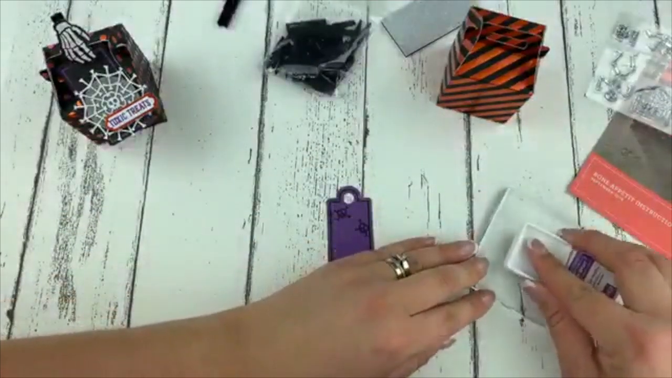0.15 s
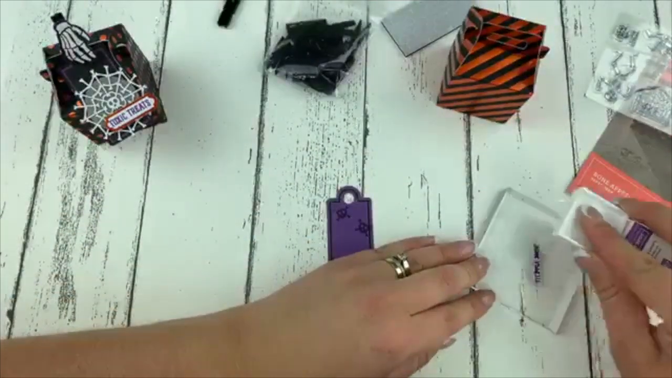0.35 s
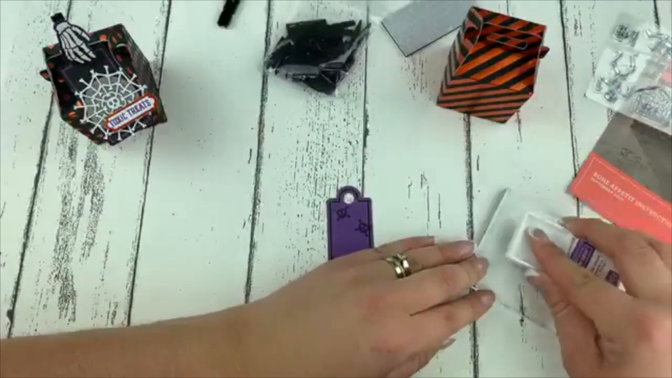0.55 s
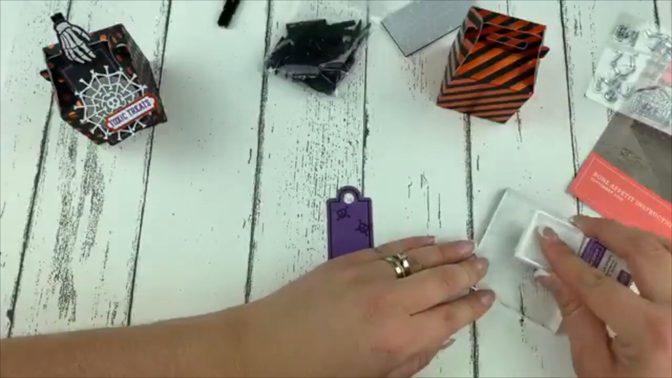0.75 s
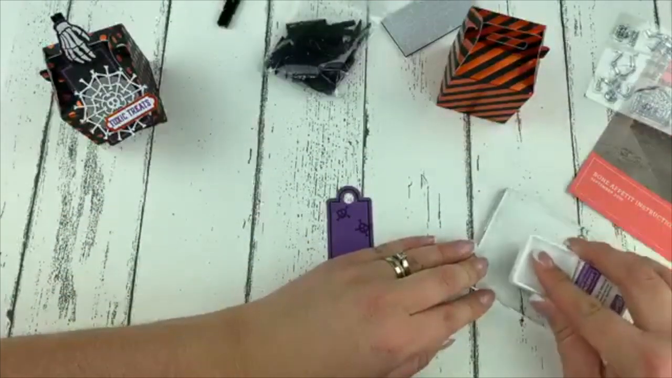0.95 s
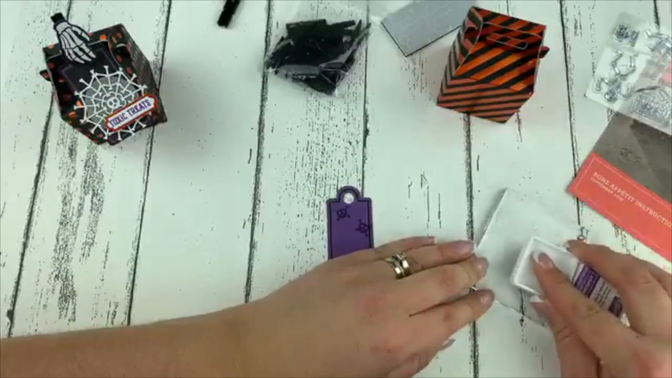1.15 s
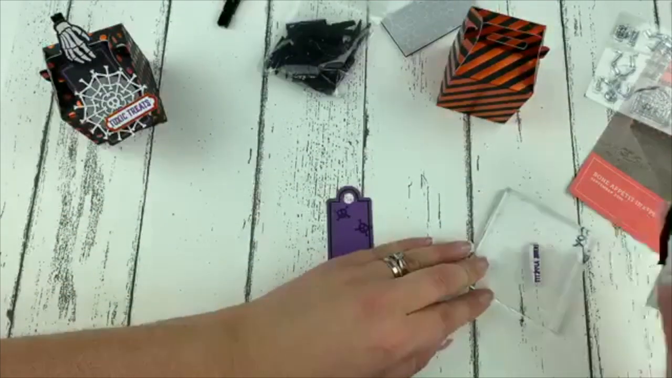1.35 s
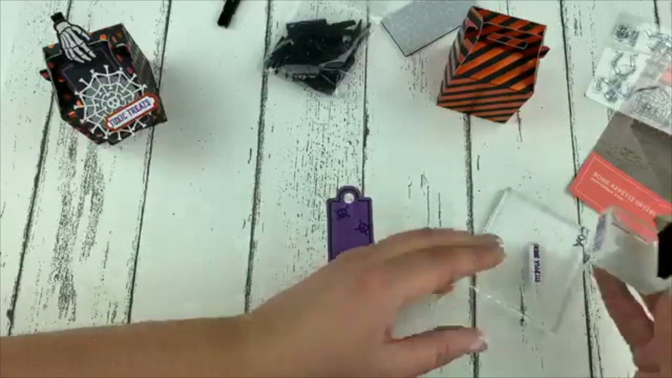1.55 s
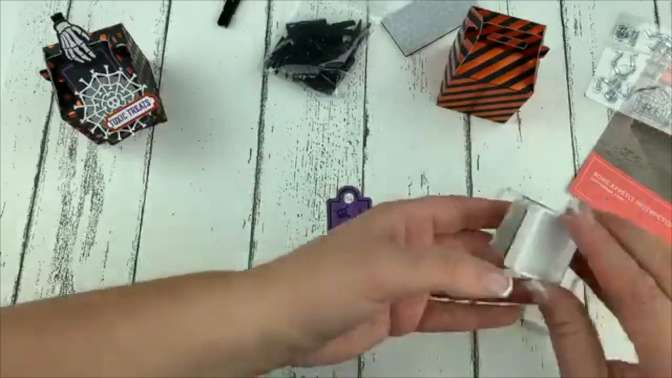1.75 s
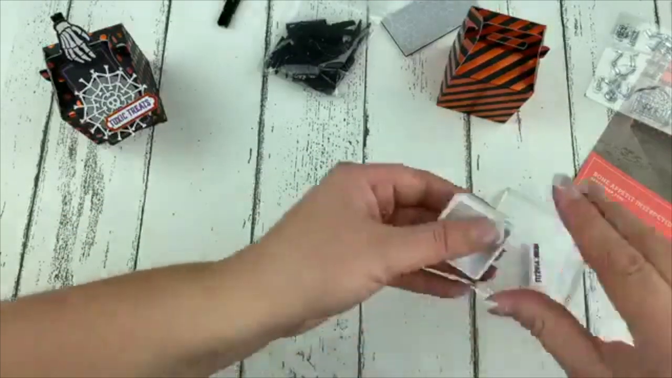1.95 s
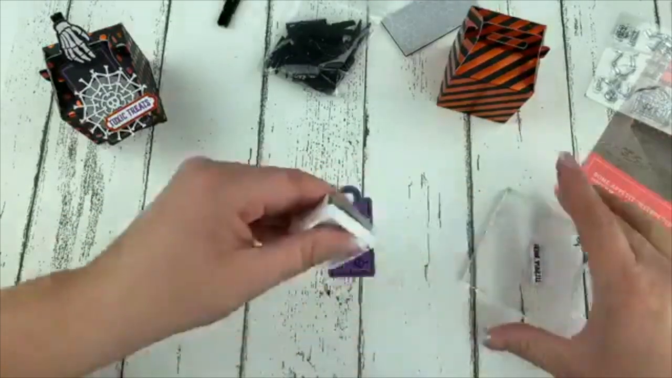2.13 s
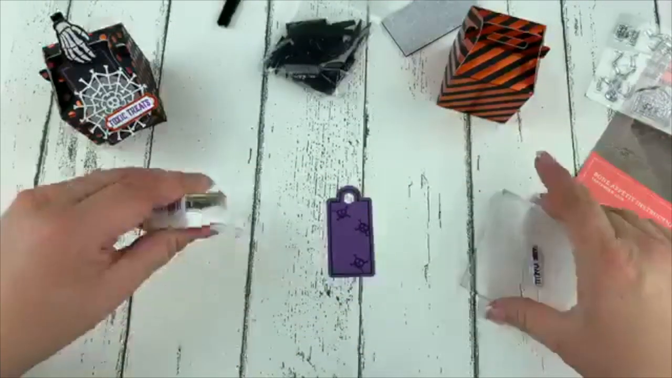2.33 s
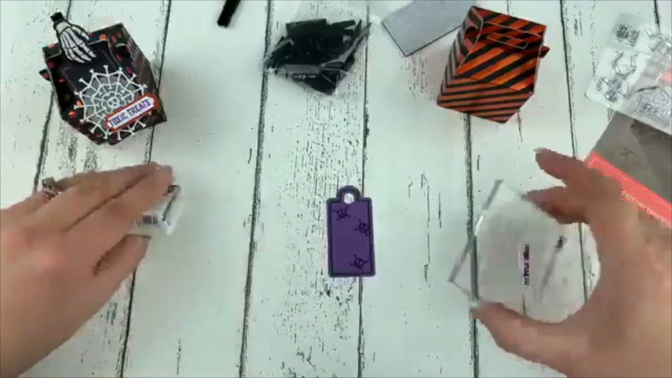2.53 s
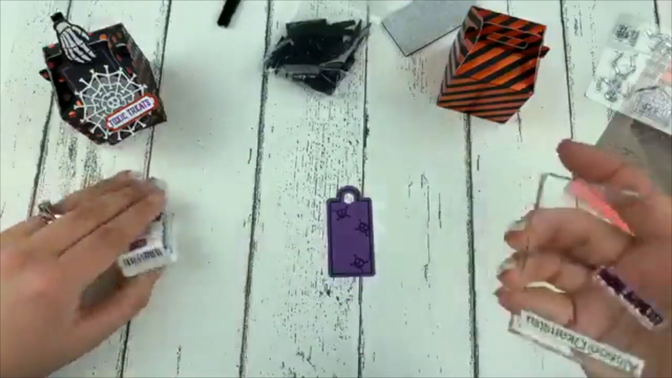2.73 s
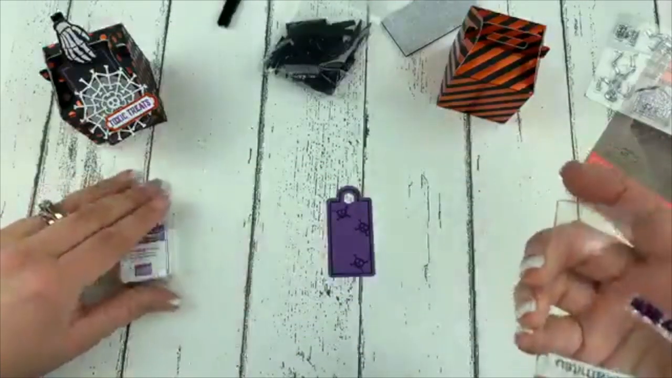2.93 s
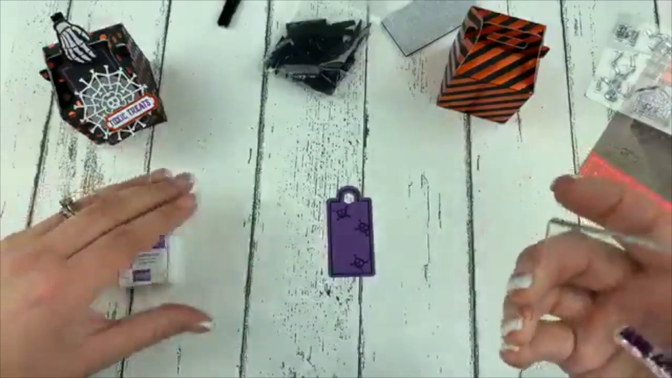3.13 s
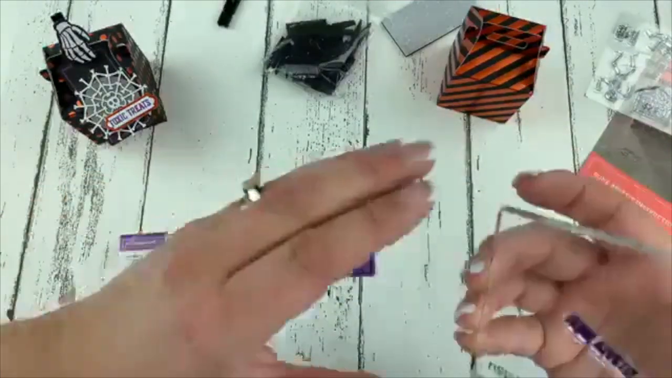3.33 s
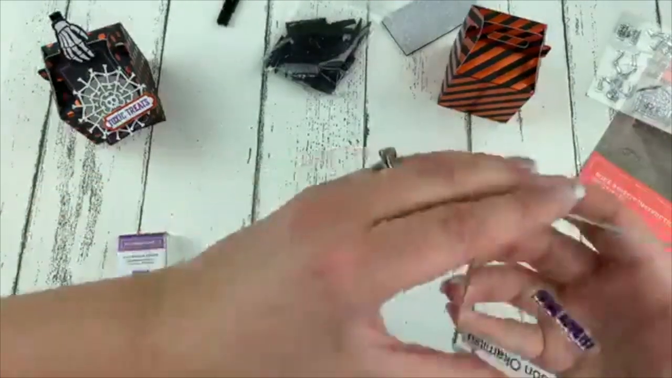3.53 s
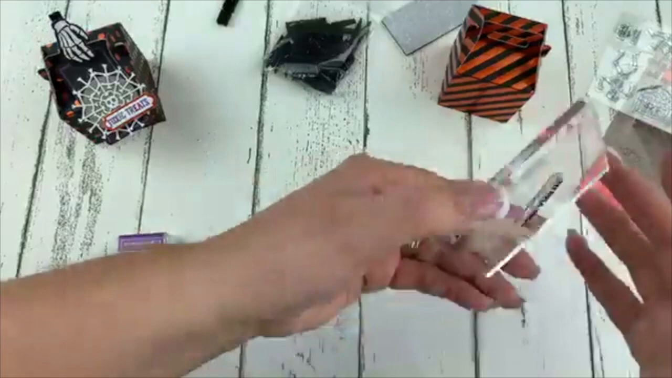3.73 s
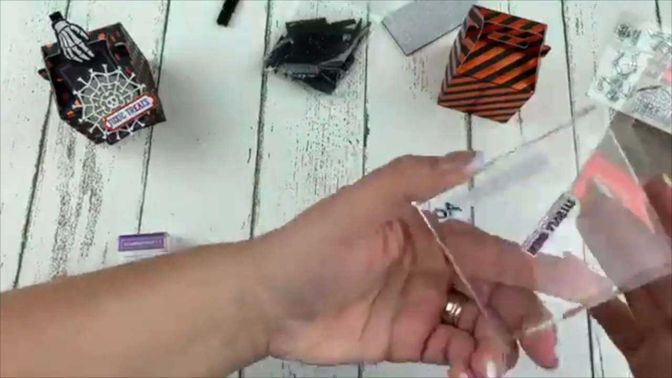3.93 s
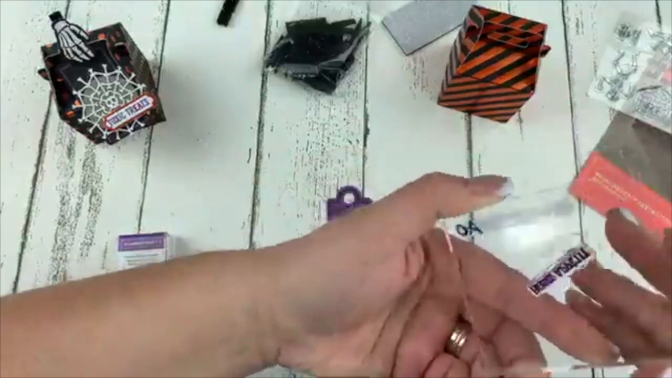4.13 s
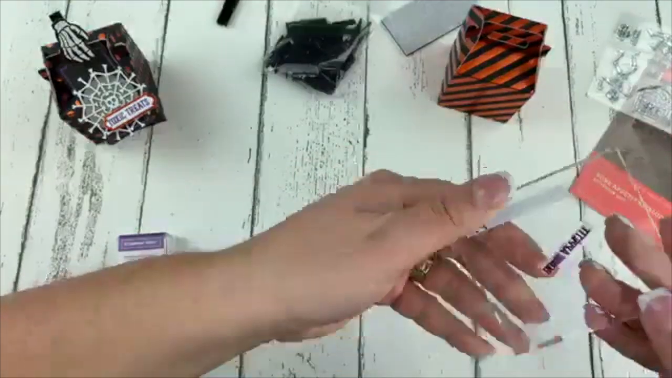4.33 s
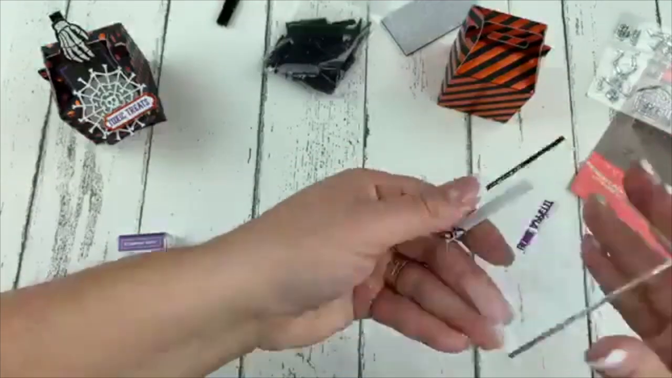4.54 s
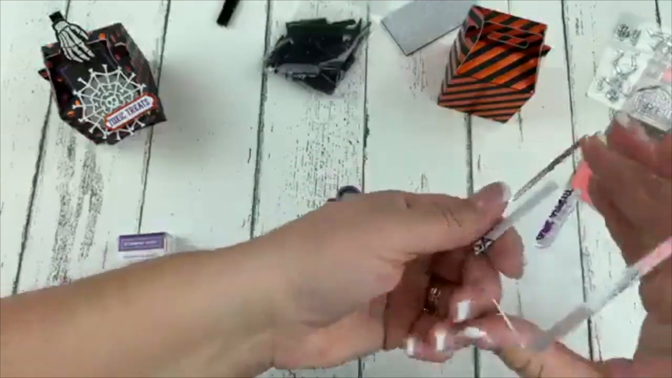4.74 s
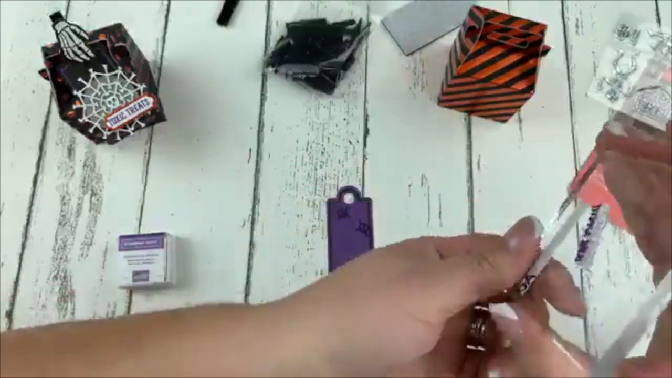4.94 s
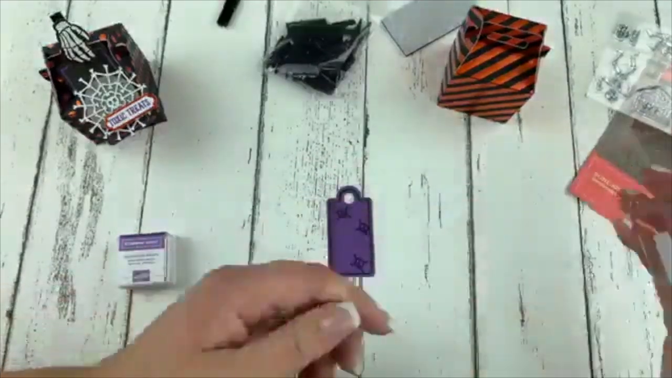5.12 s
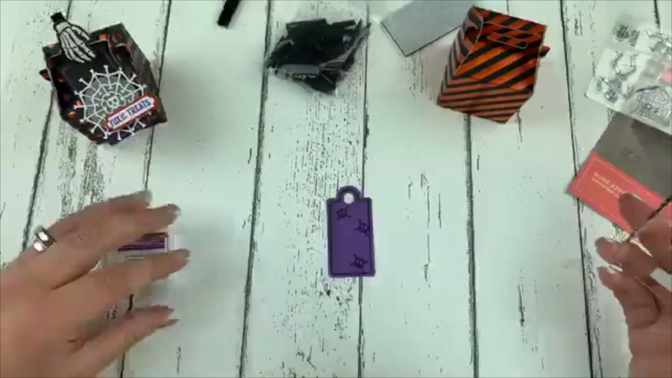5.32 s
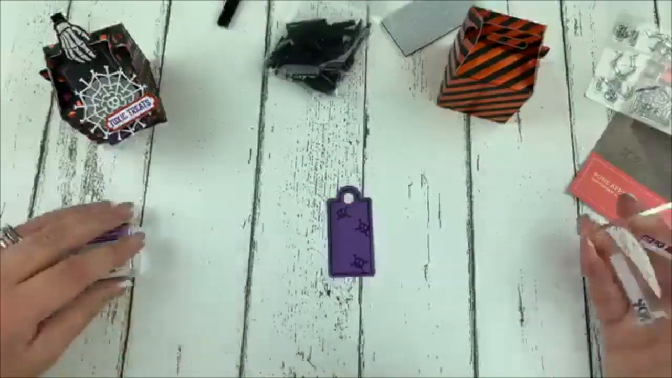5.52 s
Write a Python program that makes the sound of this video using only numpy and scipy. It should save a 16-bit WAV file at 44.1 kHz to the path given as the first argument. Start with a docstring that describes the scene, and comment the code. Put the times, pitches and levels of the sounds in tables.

```python
"""At a wooden craft table, hands work with an ink pad and a stamp on a clear block. The pad's case lands
on the boards and slides over them, plastic clicks, fingers rub the block, and pushes shake the frame.
Short forces ring decaying tones for boards and frame; filtered noise makes clicks, scrapes and rubs.
A small damped room answers, appliances hum, air and microphone hiss, and the sound drops out once."""
import sys
import numpy as np
from scipy import signal
from scipy.fft import rfft, irfft
from scipy.io import wavfile
from scipy.ndimage import uniform_filter1d

SR = 44100
rng = np.random.default_rng(int(sys.argv[2]) if len(sys.argv) > 2 else 0)


def master(y):
    """Save y as 16-bit WAV."""
    cut = np.clip(np.atleast_2d(y).T, -1, 1)
    pcm = np.round(cut * 32767)  # scale
    wavfile.write(sys.argv[1], SR, pcm.astype(np.int16))


N = 250207  # length in samples


# The pad's case lands on the boards; a flat landing stirs the small tones of the wood.
# Each row: start in seconds, relative level in dB, contact time in ms,
# flatness in dB above that level, relative level of the case's crack in dB.
LANDINGS = [(2.247, -38.5, 1.68, 12.5, -58.5), (2.3103, -39.5, 1.34, 10, -55),
            (2.5438, -28.5, 1.29, 12.5, -36.5), (2.5637, -18.5, 0.29, 4, -35), (2.567, -21, 0.45, -28, -34),
            (2.5698, -28, 0.89, -9, -44), (3.0057, -36, 0.068, 5, -16), (3.0104, -26.5, 0.25, 13.5, -29),
            (3.0159, -31, 0.4, -14, -22), (3.035, -42.5, 0.13, -5, -46), (3.842, -52.5, 1.8, -1, -63.5),
            (4.791, -67, 0.58, 0.5, -74), (5.234, -45, 2.45, 11, -68), (5.4417, -49, 0.59, 12, -51.5),
            (5.5643, -54, 0.56, 18, -48.5), (5.5681, -32.5, 0.71, 5, -72)]


def knocks():
    """Each landing pushes the boards so that they ring, and cracks the case with a noise burst."""
    force, flat, cracks = np.zeros((3, N))
    for start_s, db, contact_ms, flat_db, crack_db in LANDINGS:
        add(force, start_s, undb(db) * push(contact_ms))
        add(flat, start_s, undb(db + flat_db) * push(contact_ms))
        add(cracks, start_s, undb(crack_db) * burst(0.023))
    wood = undb(-6.5) * boards(force, flat)
    case_crack = band(band(cracks, 4000, 19000), 4400, 8000)
    return wood + case_crack


# The clear ringing tones of the boards.
# Each row: pitch in Hz, relative level in dB, time to fall by 60 dB in seconds.
BOARD_TONES = [(177.9, -6.5, 0.31), (296.3, -12, 0.1), (437, -10, 0.33), (481, -12, .1), (596.2, -1, 0.13),
               (761, -3, 0.13), (1012, 4.5, 0.05), (1170, -0.5, 0.057), (1302, -2, 0.16), (1390, 3, 0.053),
               (1640, 0, 0.038), (2350, -20.5, 0.07)]
# The countless small tones of boards and case, blurred into noise.
# Each row: centre in Hz, width of each filter pass in Hz, relative level in dB,
# time to fall by 60 dB in seconds.
SMALL_TONES = [(332, 600, -38, 0.1), (840, 810, -25.5, 0.066), (2200, 2100, -21.5, 0.044),
               (3970, 2800, -57, 0.056)]


def boards(force, flat):
    """Wood rings in clear tones driven by force, over a blur of small tones driven by flat."""
    blur = 0
    for hz, width_hz, db, t60_s in SMALL_TONES:
        noise = unit(band_twice(burst(2.7), hz, width_hz))
        blur = blur + undb(db) * noise * burst(t60_s, flat=True)
    return ring(force, BOARD_TONES) + undb(20.0) * signal.fftconvolve(flat, blur)[:N]


# Plastic clicks and nail ticks.
# Each row: start in seconds, peak of the favoured band in dB, pitch that the snap favours in Hz,
# fall-off below that pitch in dB per octave, fall-off above it in dB per octave.
SNAPS = [(1.3199, -34, 11800, 7.5, 9), (1.372, -52, 4600, 1.5, 2.7), (1.616, -56.5, 6850, 5, 4),
         (1.8197, -58.5, 5900, 3, 3.9), (1.8529, -38.5, 4200, 5, 19), (1.9622, -52, 5100, 5, 20),
         (1.9975, -21.5, 3040, 14.5, 5.7), (2.4233, -50, 6300, 6.5, 14), (2.4309, -29.5, 6280, 7.5, 8.8),
         (3.6267, -55, 7850, 4, 2), (4.3669, -41.5, 3270, 8, 3), (5.011, -60, 5950, 4.5, 2.7),
         (5.06, -52.5, 3300, 6.5, 5)]
# The resonances of the plastic case. Each row: centre in Hz, width in Hz.
CASE_TONES = [(950, 630), (2800, 1440), (4400, 1500), (6300, 2800), (8400, 2000), (11500, 3600)]


def clicks():
    """One sharp release and a few milliseconds of chatter ring the resonances of the plastic case."""
    favoured_width = 0.49  # as a share of the favoured pitch
    out = np.zeros(N)
    for start_s, db, favoured_hz, below_db, above_db in SNAPS:
        snap = 0.13 * burst(0.018)
        snap[0] = 1  # the sharp release
        for hz, width_hz in CASE_TONES + [(favoured_hz, favoured_width * favoured_hz)]:
            tone = band_twice(snap, hz, 0.77 * width_hz)
            octaves = np.log2(hz / favoured_hz)
            drop_db = max(above_db * octaves, -below_db * octaves)
            add(out, start_s, undb(db - drop_db) * tone / abs(tone).max())
    return out


# Pushes that shake the table frame.
# Each row: start in seconds, relative level in dB, push time in ms, relative level of the tick in dB.
PUSHES = [(0.0452, -35.5, 6.2, -61), (0.2068, -30, 5, -49.5), (0.599, -34.5, 4.7, -55),
          (0.661, -51, 8, -82), (0.7322, -34.5, 5.4, -57), (1.052, -35, 4.5, -56),
          (1.166, -41.5, 4.65, -65), (2.2454, -44.5, 3.4, -52.5), (2.5644, -44, 5.4, -60.5),
          (3.0029, -42.5, 3.05, -66), (3.8422, -50.5, 1.43, -57), (5.4425, -40.5, 4.1, -66),
          (5.585, -36, 9.2, -67), (5.628, -44, 7.6, -77)]
# The low tones of the frame.
# Each row: pitch in Hz, relative level in dB, time to fall by 60 dB in seconds.
FRAME_TONES = [(42, -6, 0.42), (60.5, -2, .3), (114.3, 3.5, 0.083), (175.6, -3.5, 0.2), (242, -5, 0.23),
               (317, 8, 0.083), (411, -19, 0.098)]


def thumps():
    """A push makes a soft tick through the air, and a shudder and rattle of the frame through the clamp."""
    shudder_lag_s = 0.00033
    force, ticks, rattle = np.zeros((3, N))
    for start_s, db, push_ms, tick_db in PUSHES:
        add(force, start_s + shudder_lag_s, -undb(db) * push(push_ms))
        add(ticks, start_s, undb(tick_db) * burst(0.022))
        # the rattle grows quickly, then dies away
        add(rattle, start_s, undb(db) * burst(0.33) * (1 - burst(0.025, flat=True)))
    for _ in range(3):
        rattle = band(rattle, 231, 285)
    shudder = ring(force, FRAME_TONES) + undb(4.5) * rattle
    knock = band(band(ticks, 1150, 970), 1500, 980)
    tick = undb(17.0) * knock + undb(1) * band(ticks, 3700, 7700)
    return shudder, tick


# The case scrapes over the boards.
# Each row: peak in seconds, swell in seconds, fade in seconds, level of the wood in dB,
# rasp in dB above the wood, grit in dB above the wood.
SCRAPES = [(2.34, 0.074, 0.085, -54, -10.5, -9), (2.433, .02, 0.042, -60.5, -4, 9),
           (2.6, .015, 0.061, -49, -14.5, -18), (2.69, 0.13, 0.18, -51.5, -21.5, -22),
           (2.824, 0.091, 0.024, -61.5, -11, -5.5), (5.46, 0.015, 0.027, -49, -5, -16.5),
           (5.484, 0.038, 0.037, -36, -20, -21), (5.54, 0.045, 0.075, -52.5, -19, -17.5),
           (5.61, 0.13, 0.076, -50, -23, -19)]


def slides():
    """Stick and slip: dense uneven jolts ring the boards; the case rasps and grit hisses above."""
    wood_gain, rasp_gain, grit_gain = gains(SCRAPES)
    happens = rng.random(N) < 3000 / SR  # about 3000 jolts a second
    jolts = happens * undb(0.81 * rng.exponential(size=N)) * rng.standard_normal(N)
    soft = band(band(jolts, 610, 1900), 510, 1800) * undb(2.0 * walk(60))
    wood = boards(soft, undb(7.5) * soft)
    rasp = band_twice(jolts, 2590, 2800)
    grit = band_twice(jolts, 5300, 10000)
    return wood_gain * unit(wood) + rasp_gain * unit(rasp) + grit_gain * unit(grit)


# Fingers rub on the block; the rows at 1.852 s and 1.995 s are the case lid rubbing just before it snaps. Each
# row: peak in seconds, swell in seconds, fade in seconds, level of the block's tone in dB, squeak in dB above
# that tone, treble swish in dB above that tone.
FINGER_STROKES = [(.28, 0.13, 0.032, -75, -20, 4), (1.39, 0.032, 0.067, -80, -20, 6),
                  (1.57, 0.084, 0.12, -74, -22, 2), (1.69, .04, .05, -91, -20, 18.5),
                  (1.76, .1, 0.19, -83, -20, 1), (1.852, 0.038, 0.014, -63.5, 0, -1),
                  (1.995, 0.027, .005, -66, -12, 10), (3.41, 0.084, 0.12, -65.5, -27, -9.5),
                  (3.495, 0.046, 0.026, -76.5, -14, 6.5), (3.6, 0.043, 0.1, -81.5, -21.5, 12),
                  (4.04, 0.15, 0.086, -76.5, 5, 3.5), (4.32, 0.064, 0.2, -78.5, 6.5, 13.5),
                  (4.409, 0.2, 0.03, -80.5, 8.5, 13), (4.552, 0.033, 0.017, -84, -8, 16),
                  (4.76, 0.3, 0.36, -90, -11.5, 13), (5.12, 0.11, 0.15, -69, -14.5, -6),
                  (5.21, 0.19, 0.23, -73, -23, 1)]
# What the block, the squeak and the swish favour.
# Each row: centre in Hz, width of each filter pass in Hz, relative level in dB.
BLOCK_BANDS = [(2380, 2750, 12), (4570, 260, -15.5)]
SQUEAK_BANDS = [(3120, 290, -2), (4700, 550, -9)]
SWISH_BANDS = [(8100, 1900, -0.5), (11900, 11200, 7)]


def rubs():
    """Skin drags on the smooth block, and the lid rubs just before two snaps: fluttering noise in these
    resonances."""
    skin = rng.standard_normal(N) * undb(3.2 * walk(90))
    out = 0
    for gain, bands in zip(gains(FINGER_STROKES), (BLOCK_BANDS, SQUEAK_BANDS, SWISH_BANDS)):
        layer = 0
        for hz, width_hz, db in bands:
            layer = layer + undb(db) * unit(band_twice(skin, hz, width_hz))
        out = out + gain * unit(layer)
    return out


# How long the echo lasts in each range. Each row: centre in Hz, time to fall by 60 dB in seconds.
ECHO_TIMES = [(200, 0.37), (1000, 0.2), (4000, .22), (12000, 0.065)]


def room(x):
    """A small damped room: dense echoes build up over a few milliseconds and the high treble dies first."""
    room_db = -6
    t = np.arange(SR // 2) / SR
    tail = 0
    for hz, t60_s in ECHO_TIMES:
        tail = tail + band(rng.standard_normal(len(t)), hz, 1.8 * hz) * 1000 ** (-t / t60_s)
    tail *= np.clip(t / 0.0053, 0, 1)
    return undb(room_db) * signal.fftconvolve(x, tail / np.sqrt(np.sum(tail ** 2)))[:N]


# The steady tones of the appliances. Each row: pitch in Hz, average (rms) level in dB.
HUM_TONES = [(119.8, -58), (98.5, -67), (104.8, -73.5), (201, -77), (231, -90)]


def hum():
    """Mains buzz and two slower motors: close tones beat together while their levels wander slightly."""
    t = np.arange(N) / SR
    out = 0
    for hz, db in HUM_TONES:
        level = np.sqrt(2) * undb(db + .6 * walk(3.2))
        out = out + level * np.sin(2 * np.pi * (hz * t + rng.random()))
    return out


# The tone colour of the background noise. Each row: pitch in Hz, relative level in dB per Hz.
AIR_COLOUR = [(12, -45.5), (20, -9.5), (68, -4.5), (150, -9.5), (182, -13), (222, -12), (897, -23.5),
              (1710, -25.5), (2260, -27), (4300, -31.5), (4670, -33.5), (9670, -36), (16000, -51.5)]


def air():
    """Room tone and microphone hiss: steady random noise, shaped from bass to treble."""
    air_db = -66  # rms
    hz, db = np.transpose(AIR_COLOUR)
    noise_hz = np.arange(1, N // 2 + 2) * SR / N
    colour = undb(np.interp(np.log(noise_hz), np.log(hz), db))
    return undb(air_db) * unit(irfft(rfft(rng.standard_normal(N)) * colour, N))


def undb(db):
    """Turn dB into a gain."""
    return 10 ** (np.asarray(db) / 20)


def unit(x):
    """Scale to an average (rms) level of 1."""
    return x / np.sqrt(np.mean(x ** 2))


def band(x, hz, width_hz):
    """Resonance with gain 1 at its centre."""
    hz = min(hz, .45 * SR)
    return signal.lfilter(*signal.iirpeak(hz, hz / width_hz, fs=SR), x)


def band_twice(x, hz, width_hz):
    """The same resonance two times over, which rejects other pitches more."""
    return band(band(x, hz, width_hz), hz, width_hz)


def ring(x, tones):
    """A body's decaying tones, driven by the force x; neighbours move in opposite senses."""
    out = 0
    for k, (hz, db, t60_s) in enumerate(tones):
        decay = 1000 ** (-1 / (t60_s * SR))  # per sample
        turn = 2 * np.pi * hz / SR  # angle per sample
        top = [0, decay * np.sin(turn)]
        bottom = [1, -2 * decay * np.cos(turn), decay * decay]
        out = out + (-1) ** k * undb(db) * signal.lfilter(top, bottom, x)
    return out


def add(line, start_s, sound):
    """Lay a sound into the line at start_s seconds."""
    i = int(start_s * SR)
    line[i:i + len(sound)] += sound[:N - i]


def push(ms):
    """Half-sine contact force of area 1; a longer contact is duller."""
    force = np.sin(np.pi * np.clip(np.arange(.5, 600) / (ms * SR / 1000), 0, 1))
    return force / force.sum()


def burst(t60_s, flat=False, size=8000):
    """Noise that dies away by 60 dB in t60_s seconds; with flat, only its envelope."""
    noise = 1 if flat else rng.standard_normal(size)
    return noise * 1000 ** (-np.arange(size) / SR / t60_s)


def walk(rate):
    """A wandering curve of rms 1 that glides to a new random level rate times a second."""
    step = int(SR / rate)
    levels = np.repeat(rng.standard_normal(N // step + 1), step)
    return unit(uniform_filter1d(levels, step)[:N])


def gains(strokes):
    """Gain of each layer, the later ones relative to the first; every stroke swells to its peak and fades."""
    stroke_db = 20  # climb within the swell time, and drop within the fade time
    t, out = np.arange(N) / SR, 0
    for peak_s, swell_s, fade_s, db, *rel_db in strokes:
        shape = undb(-stroke_db * np.maximum((peak_s - t) / swell_s, (t - peak_s) / fade_s))
        shape = shape * np.clip((t - peak_s + 1.1 * swell_s) / .004, 0, 1)  # contact begins
        out = out + shape * undb(db + np.array([0, *rel_db]))[:, None]
    return out.T if out.shape[0] == N else out


def scene():
    """Sum the table sounds, their echo, the shudder through the clamp and the background."""
    shudder, ticks = thumps()
    near = ticks + knocks() + slides() + rubs()
    sharp = clicks()
    # clicks in the hands are further from the table top and stir less echo
    echo = room(near + undb(-6.5) * sharp)
    return (near + sharp + echo + shudder + hum() + air())[None]


# The moment of silence: its start in seconds, its end in seconds.
DROPOUT = (3.8824, 3.8981)


def record(dry):
    """The microphone loses the deepest bass and dulls the highest treble; a short dropout; the top is cut."""
    bass_hz, dull_hz, top_hz = 28.53, 14660, 16100
    t = np.arange(N) / SR
    on = (t < DROPOUT[0]) | (t > DROPOUT[1])
    dry = signal.sosfilt(signal.butter(2, bass_hz, "high", fs=SR, output="sos"), dry)
    dry = signal.sosfilt(signal.butter(6, dull_hz, fs=SR, output="sos"), dry)
    return signal.sosfilt(signal.ellip(8, .2, 70, top_hz, fs=SR, output="sos"), dry * on)


dry = scene()
out = record(dry)
master(out)
```